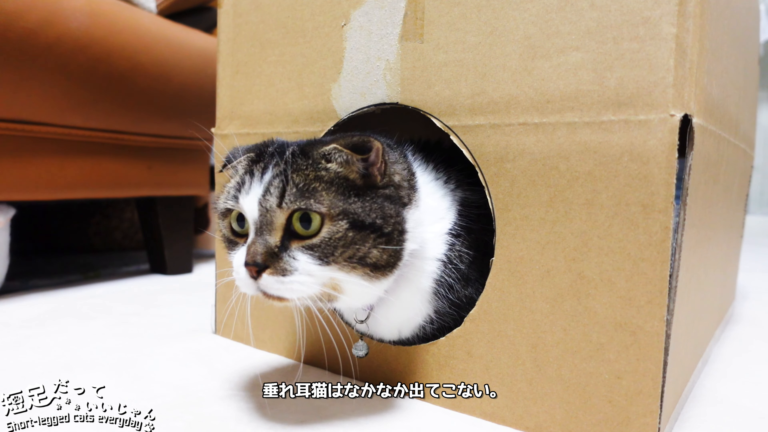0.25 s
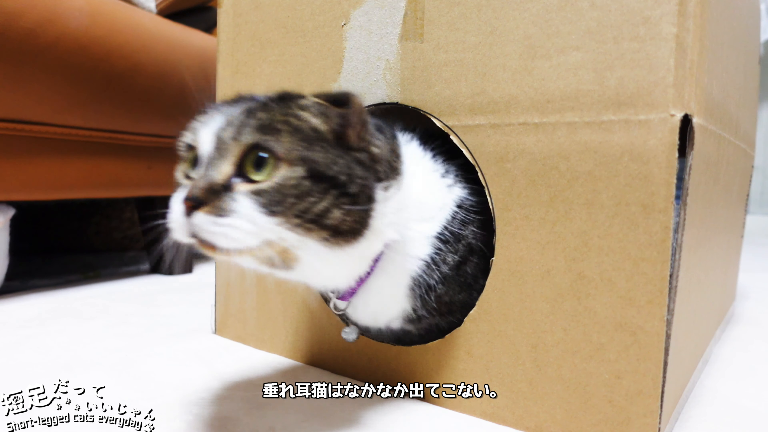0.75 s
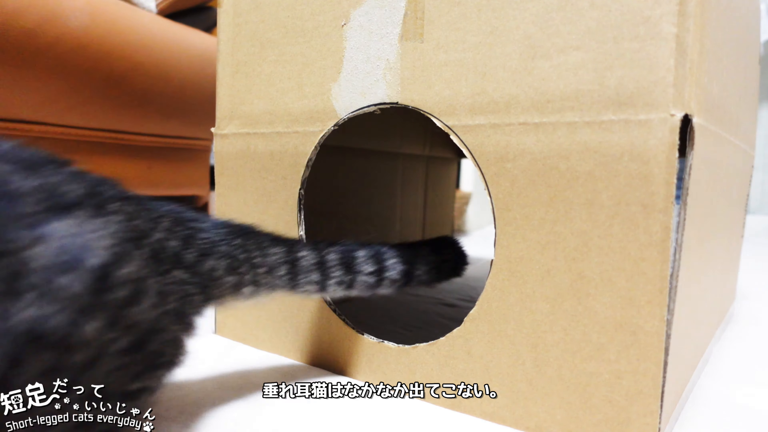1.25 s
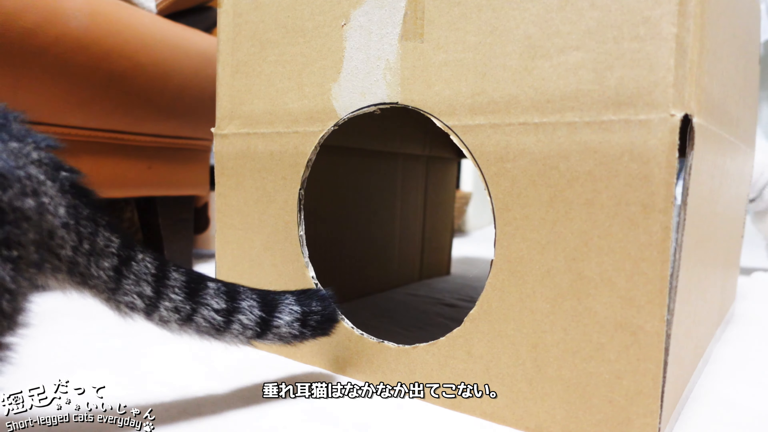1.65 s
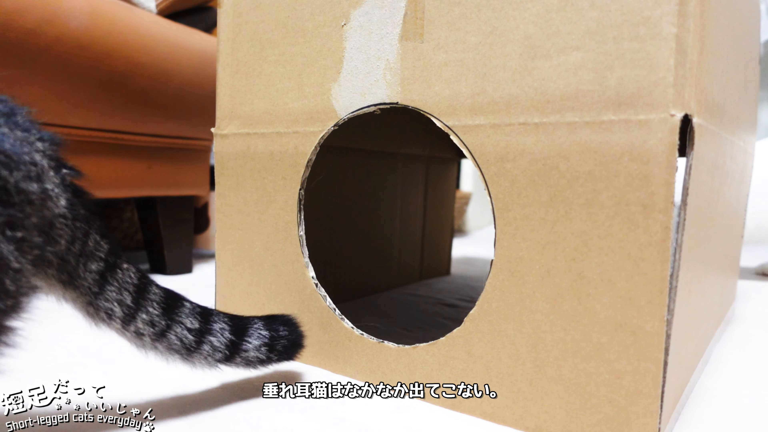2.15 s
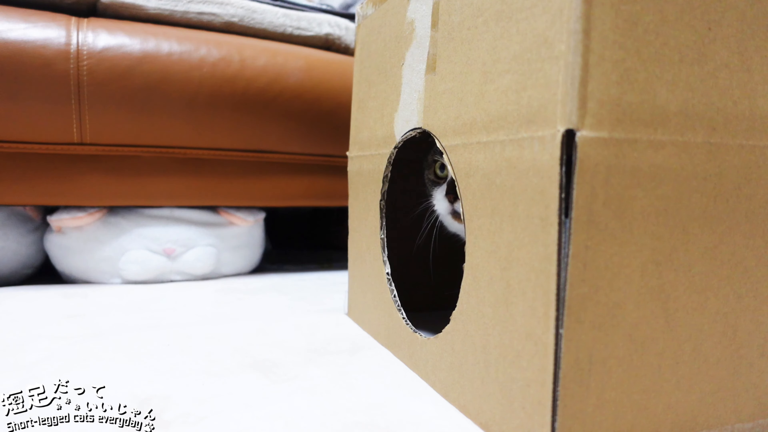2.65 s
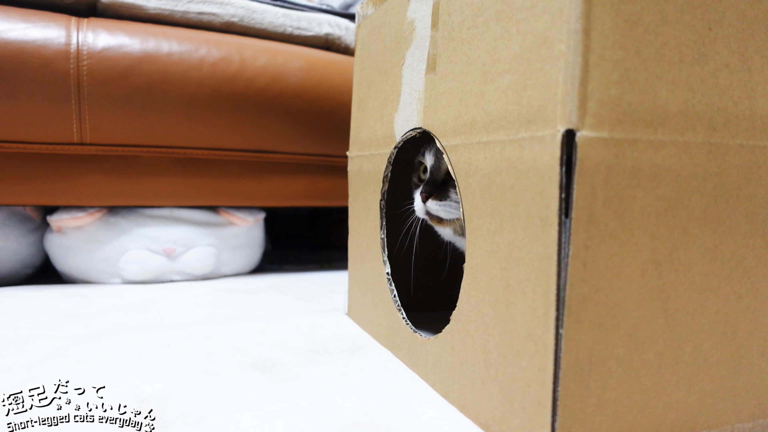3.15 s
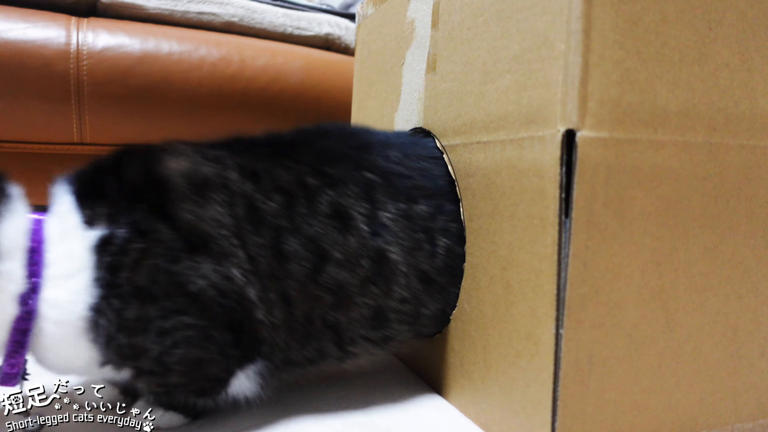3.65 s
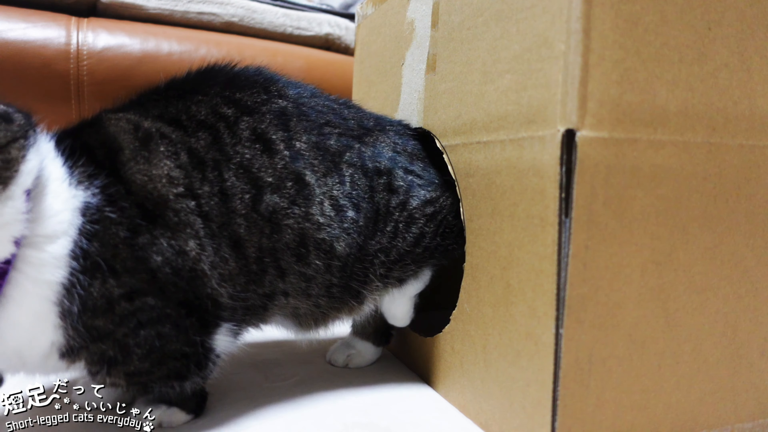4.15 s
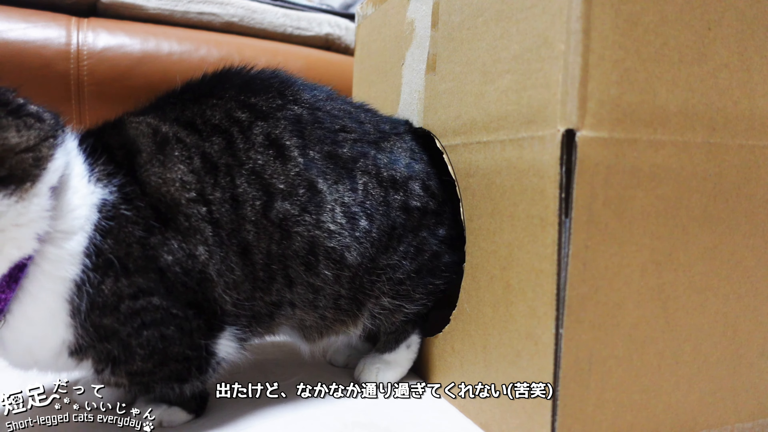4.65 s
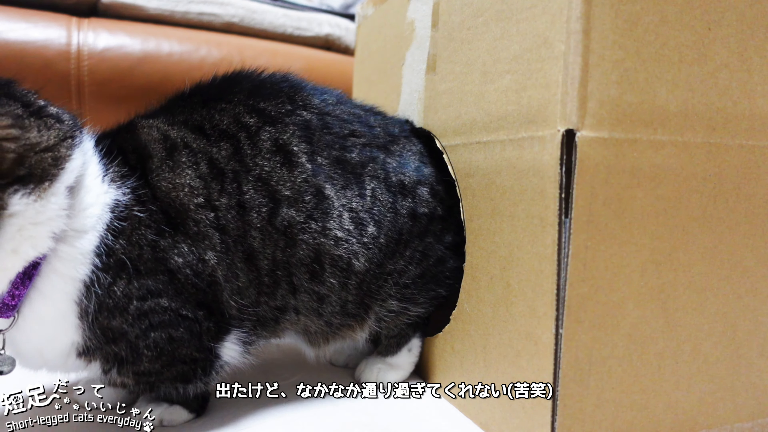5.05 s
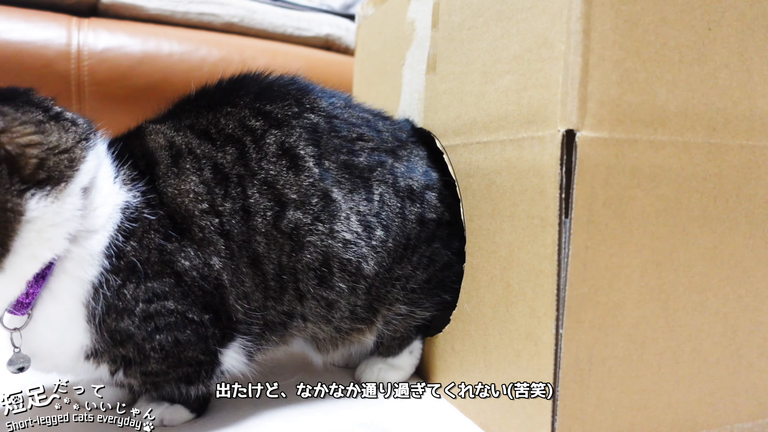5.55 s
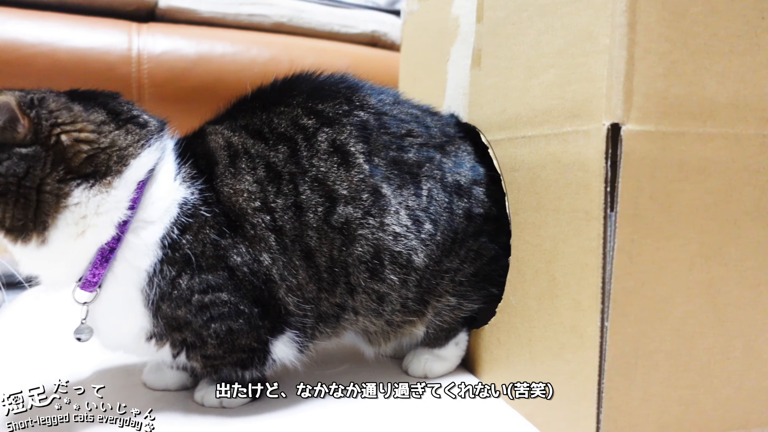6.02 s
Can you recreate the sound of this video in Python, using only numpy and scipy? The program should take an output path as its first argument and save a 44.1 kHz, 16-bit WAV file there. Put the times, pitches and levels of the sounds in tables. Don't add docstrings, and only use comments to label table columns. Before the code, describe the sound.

A cat squeezes through a hole in a cardboard box, collar charm clinking in short bursts amid soft paw thuds and rubbing fur.

```python
import sys
import numpy as np
from scipy import signal
from scipy.io import wavfile
from scipy.ndimage import uniform_filter1d

SR = 44100
rng = np.random.default_rng(int(sys.argv[2]) if len(sys.argv) > 2 else 0)


def voltage_ratio(level):
    return 10 ** (np.asarray(level, float) / 20)


def unload_wav(signal):
    wavfile.write(
        sys.argv[1],
        SR,
        np.round(np.clip(np.atleast_2d(signal).T, -1, 1) * 32767).astype(np.int16),
    )


N = 277147
T = np.arange(N) / SR
SIDES = np.array([[1], [-1]])
FADE_S, DEEPEST_S, CUT_S = 2.354, 2.360, 2.3655


def rms_one(x):
    return x / np.sqrt(np.mean(x ** 2) + 1e-20)


def at_hz(points, hz):
    f, level = np.array(points).T
    return np.interp(np.log(hz), np.log(f), level)


def pan(x, db):
    return x * voltage_ratio(db / 2 * SIDES)


def drift(rate):
    knots = rng.standard_normal(int(N / SR * 60) + 9)
    return np.interp(T * rate, np.arange(len(knots)), knots)


def filtered(x, order, hz, kind):
    return signal.sosfilt(signal.butter(order, hz, kind, fs=SR, output="sos"), x)


def ring(clicks, hz, t60):
    r, w = voltage_ratio(-60 / (t60 * SR)), 2 * np.pi * hz / SR
    return signal.lfilter([0, np.sin(w)], [1, -2 * r * np.cos(w), r * r], clicks + 1e-18)


def grains(per_s, spread):
    sizes = voltage_ratio(spread * np.minimum(rng.exponential(1, N), 4.5)) * rng.choice([-1, 1], N)
    return rms_one(sizes * (rng.random(N) < per_s / SR))


def swells(s, hold, db, rise_db_per_s, fall_db_per_s):
    t = T[::32, None]
    before, after = np.maximum(s - t, 0), np.maximum(t - s - hold, 0)
    away = rise_db_per_s * before + fall_db_per_s * after
    heard = (s < FADE_S) | (t >= CUT_S)
    return np.interp(T, t[:, 0], (heard * voltage_ratio(db - away)).sum(1))


def banded_noise(spectrum, likeness, patchy_db, lowest=25):
    edges = 25 * 2 ** np.arange(0, 9.6, .5)
    out, white = 0, rng.standard_normal((2, 2, N))
    for k, (low, high) in enumerate(zip(edges, edges[1:])):
        if low >= lowest:
            mid, side = filtered(white[k % 2], 2, [low, high], "band")
            hz = np.sqrt(low * high)
            alike = at_hz(likeness, hz)
            gain = voltage_ratio(at_hz(spectrum, hz) + patchy_db * drift(18))
            out = out + gain * (np.sqrt(1 + alike) * mid + np.sqrt(1 - alike) * side * SIDES)
    return rms_one(out)


# f/Hz, level/dB per Hz
ROOM_TONE = [(42, -10), (84, -6), (119, -5.5), (168, -10.5), (238, -10.5), (750, -13.5), (1640, -20.5),
             (15200, -25.5)]
# f/Hz, likeness/-1..1
ROOM_LIKENESS = [(60, 0.72), (180, 0.29), (550, 0.38), (1650, 0.34), (4970, 0.039), (15000, -0.055)]
# f/Hz, width/Hz, level/dB
DRONE = [(208, 18, -63), (351.7, 7, -69), (665.7, 40, -69), (726, 37, -71.5)]


def room_tone():
    out = voltage_ratio(-57.5) * banded_noise(ROOM_TONE, ROOM_LIKENESS, patchy_db=1.1)
    for hz, width, db in DRONE:
        out = out + voltage_ratio(db) * rms_one(ring(rng.standard_normal(N), hz, 2.7 / width))
    return out


def room(x, t60):
    t = T[:SR // 3]
    tail = rng.standard_normal((2, len(t))) * voltage_ratio(-60 * t / t60) * (t > .004)
    tail = signal.lfilter([1], [1, -.4], tail)
    tail = tail / np.sqrt((tail ** 2).sum(1, keepdims=True))
    return signal.fftconvolve(x[None], tail, axes=1)[:, :N]


# t/s, hold/s, boards level/dB, slow sway above the boards/dB
WEIGHT_SHIFTS = [(0, 0.47, -63.5, -22), (0.597, 0.02, -59, -2), (0.716, 0, -57.5, -2), (0.901, 0, -39, -25),
                 (0.964, 0.031, -54, 6), (1.05, 0, -49, -12), (1.109, 0.2, -44.5, 0.5),
                 (1.425, 0.064, -53.5, -13), (1.573, 0.034, -59, 9), (2.12, 0.026, -71, 11),
                 (2.371, 0, -32, -22), (2.53, 0.055, -64.5, 9), (2.794, 0.059, -54, -14),
                 (3.096, 0.16, -60.5, -17), (3.443, 0.024, -49.5, -14), (3.599, 0.015, -48, 3.5),
                 (3.66, 0.022, -48.5, -19), (3.772, 0.055, -50.5, -2.5), (4.012, 0.064, -49, -27),
                 (4.526, 0.0075, -54, -18), (5.48, 0, -47.5, 8.5), (5.57, 0.075, -51, 5),
                 (5.693, 0.11, -66, 18), (5.848, 0.023, -55, 11), (5.96, 0.042, -56.5, 11),
                 (6.056, 0.14, -53, 6.5), (6.27, 0.12, -44.5, -24)]


def rumble():
    s, hold, boards_db, sway_db = np.transpose(WEIGHT_SHIFTS)
    out = 0
    for db, band_hz in [(boards_db, (38.0, 134.0)), (boards_db + sway_db, (17.7, 51.4))]:
        mid, side = filtered(rng.standard_normal((2, N)), 2, band_hz, "band")
        weight = swells(s, hold, db, rise_db_per_s=249, fall_db_per_s=213)
        out = out + weight * rms_one(voltage_ratio(2 * drift(25)) * (mid + 0.27 * side * SIDES))
    return out


# peak t/s, peak level/dB, first f/Hz, last f/Hz, t60/s
PAW_THUDS = [(0.5350, -26, 754, 597, 0.022), (0.5416, -30.5, 296, 239, 0.076),
             (0.711, -45, 89.5, 55.5, 0.22), (0.877, -24, 360, 102, 0.021), (1.186, -36.5, 487, 430, 0.037),
             (1.209, -17, 198, 89, 0.068), (1.2334, -19, 70, 48, 0.096), (1.286, -29.5, 70, 54.5, 0.1),
             (1.576, -39.5, 76, 48.8, 0.26), (2.3649, -24, 70, 75, .053), (2.754, -40, 100, 70.4, 0.17),
             (3.313, -44.5, 100, 82, 0.14), (3.395, -31.5, 166, 100, 0.089), (3.394, -32, 406, 332, 0.033),
             (3.551, -30.5, 225, 69.4, 0.033), (4.0615, -31, 105, 93.4, 0.21),
             (4.516, -35.5, 107, 79, 0.07), (5.426, -24, 118, 63.7, 0.16), (5.567, -26, 90, 57.7, 0.087),
             (5.611, -29.5, 69, 52, 0.13), (6.137, -38.5, 570, 483, 0.021), (6.18, -33, 525, 310, 0.024),
             (6.1856, -36, 127, 85, 0.093), (6.267, -32.5, 548, 348, 0.129)]


def thuds():
    out = np.zeros((2, N))
    skew = 0.33 * rng.standard_normal(len(PAW_THUDS))
    for (s, db, first_hz, last_hz, t60), step in zip(PAW_THUDS, skew):
        rise = 0.0913 * t60
        at = int((s - rise) * SR)
        t = T[:min(N - at, SR // 2)]
        sag = 1.23 / first_hz + 0.00091
        cycles = last_hz * t + (first_hz - last_hz) * sag * (1 - np.exp(-t / sag))
        swell = np.sin(np.pi / 2 * np.clip(t / rise, 0, 1)) ** 2
        shape = swell * voltage_ratio(-60 * np.maximum(t - rise, 0) / t60)
        heard = (s < FADE_S) | (t + at / SR >= CUT_S)
        wave = np.cos(2 * np.pi * (cycles - first_hz * rise) + step * SIDES)
        out[:, at:at + len(t)] += voltage_ratio(db) * heard * shape * wave
    return out


# t/s, left-right level/dB
FLOOR_PAN = [
    (.6, -1),
    (1.2, 0.5),
    (1.6, 3),
    (2.4, .5),
    (3.3, -2),
    (4, 0),
    (5.4, 2.5),
    (5.9, 3),
    (6.2, 0),
]


def floor():
    return pan(thuds() + rumble(), np.interp(T, *np.transpose(FLOOR_PAN)))


# t/s, peak level/dB, contact cut f/Hz, rattle t60/s
BOX_KNOCKS = [(.262, -40.5, 260, 0.053), (0.5332, -28, 3500, 0.19), (3.996, -37, 1900, 0.016),
              (4.024, -38, 1500, 0.025), (1.18, -37, 530, 0.036), (.943, -39.5, 2200, 0.014),
              (4.063, -40, 3300, 0.034), (2.569, -51, 3000, .05), (4.414, -44.5, 430, 0.058),
              (4.508, -39.5, 1350, 0.13), (6.2525, -35, 590, 0.12)]
# f/Hz, level/dB, t60/s
BOX_MODES = [(252, -9.5, 0.11), (321, 0, 0.092), (346.8, 5, 0.08), (422, 4.5, 0.027), (487, -1, 0.05),
             (598, 5.5, 0.029), (745, -1, 0.043), (844, -4.5, 0.046), (1060, -14.5, 0.055),
             (1215, -7, 0.027), (1386, -7, 0.038), (1730, -2.5, 0.0064), (2110, -9, 0.015),
             (4570, -12.5, 0.0086)]
# t/s, level/dB, f/Hz, t60/s
SINGLE_NOTES = [(2.393, -36, 345, .06), (2.370, -34, 240, .08), (.5353, -30, 570, .045), (.262, -46, 560, .03),
                (3.392, -40, 200, .06), (1.18, -42, 560, .02), (.5345, -46, 2380, 0.011),
                (0.49, -56, 3270, .016), (2.572, -36.5, 1380, 0.011), (5.7, -58, 740, 0.037),
                (2.588, -40.5, 1080, 0.048), (5.847, -46.5, 2650, 0.02), (5.846, -47, 730, 0.092),
                (6.269, -53.5, 4700, 0.061), (6.27, -51, 2400, .04), (.906, -46.5, 11300, 0.058),
                (.8515, -31.5, 2700, 0.0019), (1.298, -44, 8420, 0.12), (4.509, -33, 482, 0.038)]


def knocks():
    out = np.zeros(N)
    for s, db, cut_hz, rattle_t60 in BOX_KNOCKS:
        fade = voltage_ratio(-60 * T[:SR // 4] / rattle_t60)
        shake = rng.standard_normal(SR // 4)
        push = .2 * uniform_filter1d(shake, size=16) * fade + .1 * shake * fade ** 2
        push[0] = 1
        push = signal.lfilter(*signal.butter(2, cut_hz, fs=SR), push)
        sound = 0
        for k, (hz, mode_db, t60) in enumerate(BOX_MODES):
            strike_db = 0.46 * mode_db + 1.5 * rng.standard_normal()
            sound = sound + ring(push, hz, 0.35 * t60) * voltage_ratio(strike_db) * (-1) ** k
        sound = filtered(sound, 2, 170, "high")
        at = int(s * SR)
        out[at:at + len(sound)] += (voltage_ratio(db) * sound / np.abs(sound).max())[:N - at]
    for s, db, hz, t60 in SINGLE_NOTES:
        out += ring(voltage_ratio(db) * (np.arange(N) == int(s * SR)), hz, t60)
    return out


# t/s, hold/s, level/dB
WALL_PRESSES = [
    (1.035, 0.038, -49.5),
    (1.181, 0.085, -55),
    (2.395, 0.012, -42.5),
    (3.302, 0.27, -57.5),
    (3.974, .01, -48.5),
    (3.993, 0.035, -38.5),
    (4.061, .022, -38),
    (6.255, .012, -43),
    (6.276, .02, -40),
]


def drag():
    slips = grains(1500, 3.1)
    pressure = swells(*np.transpose(WALL_PRESSES), rise_db_per_s=558, fall_db_per_s=553)
    wall = 0
    for k, (hz, db, t60) in enumerate(BOX_MODES[1:]):
        wall = wall + ring(slips, hz, 1.27 * t60) * voltage_ratio(db) * (-1) ** k
    wall = rms_one(signal.lfilter(*signal.butter(2, 280, "high", fs=SR), wall))
    edge = rms_one(ring(slips, 2420, 0.011))
    return pressure * (voltage_ratio(-2.5) * wall + pressure * voltage_ratio(21.6) * edge)


# t/s, hold/s, hair hiss level/dB, board rustle above it/dB
FUR_STROKES = [(0.666, 0.011, -58.5, -3.5), (0.791, 0.13, -58.5, -5.5), (0.956, 0.12, -51.5, -5),
               (1.205, 0.17, -60, 0), (2.354, 0.093, -68, 4), (2.576, 0.0045, -61, 8),
               (3.472, 0.054, -53, -5.5), (3.585, 0.05, -52.5, -12.5), (3.774, 0.13, -56, -8),
               (3.997, .06, -60, 4.5), (4.132, 0.088, -63, -14), (4.27, 0.13, -74, -22)]
# f/Hz, level/dB per Hz
HAIR_TONE = [(3000, -49), (4200, -23), (5500, 3), (6600, 9), (8000, -2), (11000, -9.5), (14000, -5),
             (16500, -20)]


def slides():
    s, hold, hiss_db, board_db = np.transpose(FUR_STROKES)
    return [swells(s, hold, db, rise_db_per_s=394, fall_db_per_s=226) for db in (hiss_db, hiss_db + board_db)]


def fur():
    bunches = 1 + 2.6 * np.abs(uniform_filter1d(grains(400, 2.1), size=40))
    hiss = banded_noise(HAIR_TONE, [(1500, 1.0), (16000, 0.27)], patchy_db=1.5, lowest=2200)
    mid, side = filtered(rng.standard_normal((2, N)), 2, [1000, 3300], "band")
    board = mid + 0.14 * side * SIDES
    hiss_gain, board_gain = slides()
    return hiss_gain * rms_one(bunches * hiss) + board_gain * rms_one(bunches * board)


# t/s, click level/dB, low, middle and high mode level/dB
FREE_CLINKS = [(0.906, -44, -57, -64, -61), (1.03, -16.5, -39, -45, -40), (1.0475, -23, -37.5, -45, -52),
               (1.056, -23, -54, -52, -56), (1.1977, -50, -59, -74, -66), (1.2954, -33, -29.5, -44, -28),
               (1.3147, -39, -31.5, -47, -52), (1.3281, -38, -29.5, -42, -44), (1.348, -48, -43, -52, -45),
               (1.4306, -40, -64, -63, -56), (2.099, -37, -53, -66, -50), (2.1794, -45, -51, -76, -76),
               (2.193, -47, -57, -76, -76), (2.2715, -40.5, -50, -75, -70), (3.59, -22, -33, -66, -54)]
# t/s, click level/dB, low, middle and high mode level/dB
BRUSHED_CLINKS = [(0.9794, -27, -26, -49, -48), (0.989, -45, -28, -56, -60), (1.002, -36, -34.5, -53, -60),
                  (1.0175, -19, -27, -46, -44), (1.25, -23, -37.5, -76, -68), (1.336, -26, -41, -45, -38),
                  (1.359, -33, -53, -56, -62), (1.3915, -40, -51, -54, -68),
                  (2.116, -35.5, -47.5, -42.5, -60), (2.16, -45, -52, -51.5, -60),
                  (2.2865, -39, -41, -63, -64), (3.5113, -21, -40, -66, -63), (3.525, -29, -30.5, -69, -50),
                  (3.555, -43, -45, -76, -72)]
# t/s, click level/dB, low, middle and high mode level/dB
MUFFLED_CLINKS = [(1.0447, -30, -40, -47, -52), (1.084, -48, -56, -66, -70), (2.222, -58, -60, -78, -78),
                  (3.497, -45, -52, -66, -70), (3.546, -40, -48, -74, -72), (1.217, -47, -50, -72, -70),
                  (1.1322, -36, -55, -72, -74), (1.2906, -17.5, -24.5, -44, -23.5),
                  (1.3408, -29, -35, -48, -42), (1.3738, -34, -49, -56, -66), (1.4247, -35, -45, -62, -50),
                  (2.111, -42, -46, -46, -43), (2.3246, -48, -46, -75, -62), (3.4724, -35, -48, -70, -72),
                  (3.481, -31, -43, -47, -66), (3.485, -39, -39, -49, -70), (3.5054, -18.5, -24, -62, -52),
                  (3.6029, -25, -31.5, -68, -58), (3.611, -29, -41, -70, -60), (3.7045, -34, -45, -59, -69),
                  (3.7449, -36, -47, -68, -66)]


def clinks():
    kinds = [(FREE_CLINKS, (.45, .25, .055)),
             (BRUSHED_CLINKS, (.1, .14, .04)),
             (MUFFLED_CLINKS, (.045, .1, .03))]
    return sorted((*row, *t60) for rows, t60 in kinds for row in rows)


# t/s, click level/dB
DULL_TICKS = [(0.665, -48), (0.8515, -31.5), (0.8983, -49), (0.954, -46), (0.9642, -43), (0.9721, -45),
              (1.0325, -27), (1.0585, -32), (1.2535, -39), (1.383, -46), (2.131, -50), (2.151, -47),
              (1.2665, -50), (1.4006, -54), (1.4545, -45), (2.5677, -41), (3.4653, -43), (3.5014, -34),
              (3.515, -27), (3.529, -34), (3.7085, -35), (3.6084, -25), (3.6392, -41), (3.6491, -42),
              (3.6549, -38), (3.6648, -34.5), (3.6686, -36), (3.6958, -47), (3.7771, -37), (3.7928, -47),
              (3.8057, -39), (3.8223, -41), (3.9029, -55), (4.198, -39), (4.2027, -45), (4.3293, -43),
              (4.5124, -42.5)]
# f/Hz, level/dB, t60/s
CLICK_MODES = [(2920, -38, 0.00074), (4670, -2, 0.0032), (5800, -1.5, 0.0058), (6320, 1, 0.0058),
               (7120, 0.5, 0.0028), (8260, -8.5, 0.0032), (10470, -7.5, 0.0028), (13600, -15, .002)]


def clicks():
    s, db = np.transpose([row[:2] for row in clinks()] + list(DULL_TICKS))
    luck = rng.standard_normal((len(s), len(CLICK_MODES) + 1))
    at = (s * SR).astype(int)
    rebound = at + (SR * .0007 * (1 + np.abs(luck[:, -1]))).astype(int)
    chatter = voltage_ratio(-16) * slides()[0] * grains(250, 2.5)
    out = np.zeros(N)
    for k, (hz, mode_db, t60) in enumerate(CLICK_MODES):
        turned_away_db = 6 * (hz > 9000) * (s > FADE_S)
        sign, train = (-1) ** k, np.zeros(N)
        train[at] = voltage_ratio(db + mode_db - turned_away_db - 5.0 + luck[:, k]) * sign
        train[rebound] += 0.64 * train[at]
        out += ring(train + chatter * voltage_ratio(mode_db) * sign, hz, t60)
    return filtered(out, 2, 3300, "high")


# t/s, left lead/ms, low mode left-right level/dB, high modes left-right level/dB
CHARM_BEARING = [
    (1.0, 0.03, -3, -2),
    (1.3, 0.031, -8.5, 5.5),
    (2.35, 0.033, -6, 4.5),
    (2.37, .008, .8, -2.5),
]
# t/s, twin above the low mode/dB, low modes sharp/Hz, high mode sharp/Hz
CHARM_HANG = [(.98, -14, 8, 10), (1.045, -7, 10, 40), (1.056, 3, 20, 20), (1.25, -17, 0, 0),
              (1.296, -16, -5, 0), (1.315, -11, 0, 20), (1.374, 4, 0, 40), (1.392, -7, 10, 35),
              (1.43, 3, 5, 40), (2.1, -5, 15, 40), (2.29, -21, 22, 40), (3.47, -5, 30, 30),
              (3.51, -18, 12, 0), (3.526, -21, 35, 40), (3.59, -13, 5, 40), (3.61, -6, 35, 40),
              (3.7, -15, 30, 20)]


def charm():
    s, _, low_db, middle_db, high_db, low_t60, middle_t60, high_t60 = np.transpose(clinks())
    last = np.clip(np.searchsorted(s, T) - 1, 0, None)
    age = np.where(T > s[0], T - s[last], 99)
    nudge = np.cumsum(0.5 * rng.standard_normal((len(s), 4)), axis=0)[last]

    when, *columns = np.transpose(CHARM_BEARING)
    lead_ms, low_pan, high_pan = (np.interp(T, when, c) for c in columns)
    heard = T + lead_ms / 2000 * SIDES

    when, *columns = np.transpose(CHARM_HANG)
    twin_db, low_sharp, high_sharp = (np.interp(s, when, c) for c in columns)
    sway = .65 * uniform_filter1d(drift(45), size=900)
    flicker = voltage_ratio(1.4 * drift(55))

    def tone(k, hz, sharp, db, t60):
        height = uniform_filter1d(voltage_ratio(db[last] - 60 * age / t60[last]), size=16, origin=7)
        cycles = hz * heard + np.cumsum(sharp[last]) / SR
        return flicker * height * np.sin(2 * np.pi * cycles + nudge[:, k] + sway)

    low = tone(0, 4221, low_sharp, low_db, low_t60)
    low = low + tone(1, 4343, low_sharp, low_db + twin_db, low_t60)
    high = tone(2, 9952, low_sharp, middle_db + 7.0, middle_t60)
    high = high + tone(3, 10460, high_sharp, high_db + 11.5, high_t60)
    return pan(low, low_pan) + pan(high, high_pan)


def scene():
    ringing, taps = charm(), clicks()
    box = knocks() + drag()
    mix = room_tone() + floor() + box + fur() + taps + ringing
    mix = mix + room(voltage_ratio(-14) * (taps + ringing.mean(0)), 0.09)
    mix = mix + voltage_ratio(-20) * room(box, 0.074)
    dip_db = np.interp(T, [FADE_S, DEEPEST_S, CUT_S - 1 / SR, CUT_S], [0.0, -14, -11, 0.0])
    return mix * voltage_ratio(dip_db)


def band_limit(x):
    return signal.sosfilt(signal.butter(12, 16820, fs=SR, output="sos"), x)


def record(dry):
    top_cut = signal.cheby2(12, 40, 16300, fs=SR, output="sos")
    mix = signal.sosfilt(top_cut, dry)
    return band_limit(mix)


dry = scene()
out = record(dry)
unload_wav(out)
```